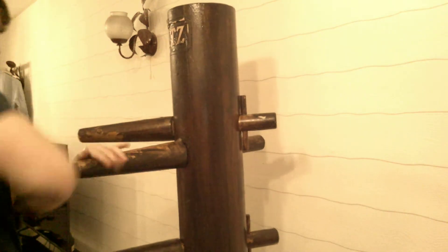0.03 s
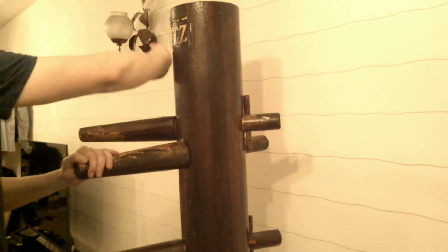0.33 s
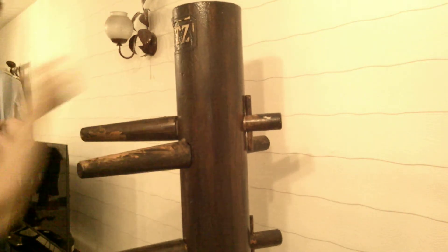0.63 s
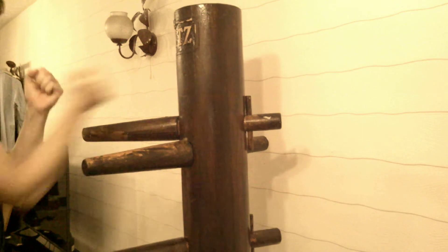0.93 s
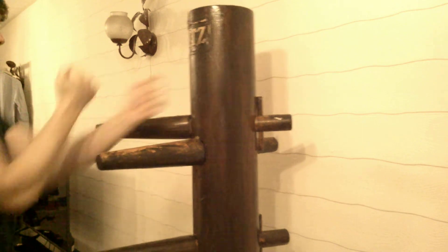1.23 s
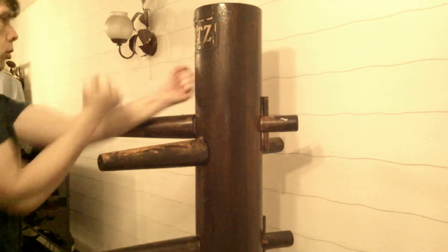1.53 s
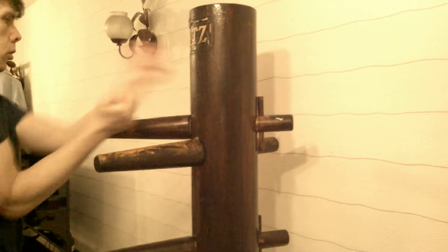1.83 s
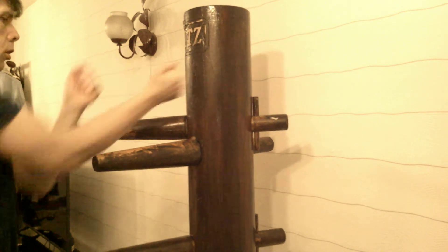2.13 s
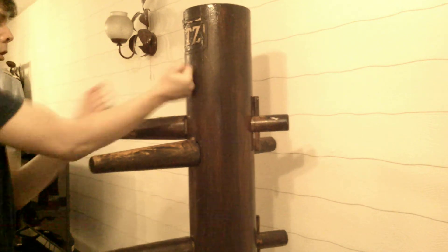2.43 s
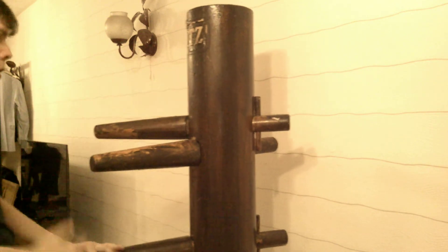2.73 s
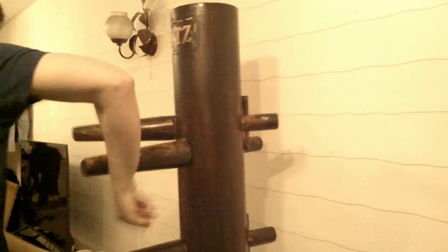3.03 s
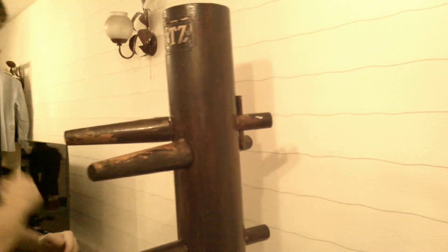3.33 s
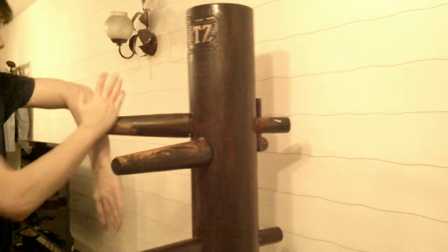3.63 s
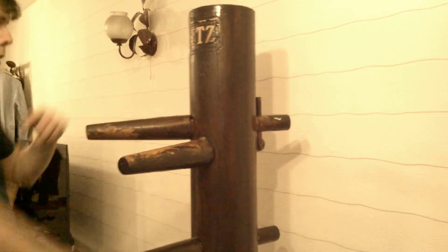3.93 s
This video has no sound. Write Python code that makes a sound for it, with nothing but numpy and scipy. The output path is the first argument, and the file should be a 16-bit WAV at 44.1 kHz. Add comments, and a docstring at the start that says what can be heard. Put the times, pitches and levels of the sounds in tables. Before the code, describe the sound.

A wooden practice dummy takes a run of dull blows and skin slaps, with low booms and faint sleeve rustles between them. Two much louder, hollow wooden knocks follow, rattling and slightly overloading the microphone in a small room.

```python
"""Practice on a wooden training dummy

In a small, quiet room, hands and forearms slap each other and thud on the dummy's trunk.
After each blow the heavy trunk sways with a low boom; sleeves rustle between moves.
Twice a loose wooden arm is whacked hard against its socket: it knocks, clatters and rings,
overloading the microphone."""
import sys
import numpy as np
from scipy import signal
from scipy.io import wavfile

SR = 44100
rng = np.random.default_rng(int(sys.argv[2]) if len(sys.argv) > 2 else 0)


def generate_wav(signal):
    """Clip the signal to [-1, 1] and save it as 16-bit WAV at the path in sys.argv[1]."""
    frames = np.transpose(np.atleast_2d(signal))
    scaled = np.clip(frames, -1, 1) * 32767
    pcm = np.round(scaled).astype(np.int16)
    wavfile.write(sys.argv[1], SR, pcm)


N = 176400
T = np.arange(N) / SR

# Blows of hands and forearms. Each row: start in seconds, thud level in dB, thud pitch in Hz,
# smack level in dB, skin brush level in dB, boom level in dB.
HAND_BLOWS = [(0.01, -32, 158.5, -56, -81, -45), (0.22, -31, 241, -55.5, -76, -25.5),
              (0.618, -38, 212, -74, -99, -64), (0.65, -39.5, 141, -74, -97, -42),
              (0.975, -42.5, 334, -50.5, -98, -31.5), (1.04, -51.5, 250, -56, -96, -62),
              (1.102, -34.5, 164, -39, -68, -23.5), (1.144, -38.5, 119, -54, -88, -53),
              (1.33, -45, 430, -64.5, -96, -40), (1.492, -41.5, 176, -41, -67, -30),
              (1.518, -43.5, 109, -49, -68, -41), (1.591, -53, 560, -69, -90, -36),
              (1.66, -25, 230.4, -42, -76, -25), (1.715, -30.5, 380, -44, -64, -46),
              (1.829, -50.5, 250, -51, -77, -27.5), (1.851, -28, 230, -41.5, -67, -41),
              (2.037, -29.5, 120, -43.5, -68, -23), (2.227, -41, 515, -51, -77, -30),
              (2.31, -40, 526, -71, -99, -56), (2.3795, -31.5, 210, -35.5, -85, -24.5),
              (2.597, -43, 304, -68, -95, -28.5), (2.987, -29, 382, -35, -64.5, -25.5),
              (3.14, -56, 300, -56.5, -77, -51.5), (3.376, -59, 560, -59.5, -87, -50),
              (3.448, -36, 123, -66, -90, -51), (3.551, -24, 193, -29.5, -58, -25.5),
              (3.709, -34.5, 295, -51.5, -91, -52)]

# Noise is shaped in bands a third of an octave wide; edges and centres are in Hz.
EDGES = 8200 * 2 ** (np.arange(-26, 4) / 3)
CENTRES = np.sqrt(EDGES[1:] * EDGES[:-1])
BAND_FILTERS = [signal.butter(3, band, "band", fs=SR, output="sos") for band in zip(EDGES, EDGES[1:])]


def from_db(db):
    """Turns decibels into a gain; square it to get power."""
    return 10 ** (np.asarray(db) / 20)


def at_bands(points):
    """Reads a table of frequencies and values at the centre of each band."""
    hz, value = np.transpose(points)
    return np.interp(np.log(CENTRES), np.log(hz), value)


def shares(db_per_hz):
    """The share of the total power that falls in each band."""
    power = from_db(db_per_hz) ** 2 * np.diff(EDGES)
    return power / power.sum()


def add(out, start, sound):
    """Mixes a sound in at a start time in seconds."""
    i = max(int(start * SR), 0)
    out[i:i + len(sound)] += sound[:N - i]


def swell(rise_s):
    """Rises smoothly to 1 at rise_s, then dies away."""
    progress = T[:SR] / rise_s
    return (progress * np.exp(1 - progress)) ** 2


def damped_tone(hz, rise_s):
    """A short tone that swells and dies."""
    return swell(rise_s) * np.sin(2 * np.pi * hz * T[:SR])


def ring(modes):
    """A struck thing rings with its own tones (modes), each fading by 60 dB in fade_s seconds."""
    t = T[:SR]
    return sum((-1) ** k * from_db(db - 60 * t / fade_s) * np.sin(2 * np.pi * hz * t)
               for k, (hz, fade_s, db) in enumerate(modes))


def banded_noise(powers):
    """Noise in which each band follows its own power over time."""
    white, out = rng.standard_normal((2, N)), 0
    for k, power in enumerate(powers):
        gain = np.sqrt((power + 1e-18) * SR / 2 / (EDGES[k + 1] - EDGES[k]))
        out = out + signal.sosfilt(BAND_FILTERS[k], white[k % 2] * gain)
    return out


def in_room(blows, powers, rise_s, direct_db, echo_scale):
    """Each blow is a short burst of noise, direct_db above a room echo whose low notes last longest."""
    # Each row: frequency in Hz, seconds for the echo to fade by 60 dB before echo_scale shortens it.
    echo_times = [(60, 0.92), (150, 0.41), (400, 0.41), (800, 0.33), (2000, 0.36), (4000, 0.25),
                  (8000, 0.22)]
    t, burst_fade_s = T[:SR], 0.066
    direct = from_db(direct_db - 60 * t / burst_fade_s) ** 2
    onset = (1 - np.exp(-t / rise_s)) ** 2
    bands = []
    for fade_s, strengths in zip(at_bands(echo_times) * echo_scale, np.transpose(powers)):
        echo = from_db(-60 * t / fade_s) ** 2
        decay = onset * (direct + echo)
        power = np.zeros(N)
        for (start, *_), strength in zip(blows, strengths):
            add(power, start, strength * decay)
        bands.append(power)
    return banded_noise(bands)


def background():
    """The room rumbles and hisses softly, and sleeves swish between the blows."""
    # Tone colours of the room and the cloth. Each row: frequency in Hz, relative level in dB per Hz.
    room_colour = [(15, 22), (26, 8), (45, -5.5), (80, -6), (130, -12.5), (180, -28), (280, -20.5),
                   (400, -33.5), (650, -20), (900, -36.5), (1200, -40.5), (2000, -47.5), (2900, -55),
                   (4200, -75.5), (7400, -64), (10000, -85.5), (16000, -85)]
    sleeve_colour = [(120, 0.5), (300, 15), (700, 9.5), (1100, -2.5), (2000, -14), (3000, -21), (4500, -50),
                     (7400, -43), (10000, -64)]
    # Sleeve movements. Each row: start in seconds, level in dB, length in seconds.
    swishes = [(0.76, -53, 0.32), (1.23, -50, 0.12), (1.438, -47, 0.062), (1.56, -62, .1),
               (1.713, -42.5, 0.1), (2.263, -53, 0.19), (2.714, -45.5, 0.29), (3.348, -53, .16)]
    motion = np.zeros(N)
    for start, db, length in swishes:
        arch = np.sin(np.pi * np.clip(T[:SR] / length, 0, 1))
        add(motion, start, (from_db(db) * arch) ** 2)
    room = from_db(-39) ** 2 * shares(at_bands(room_colour))
    sleeves = shares(at_bands(sleeve_colour))
    return banded_noise([steady + cloth * motion for steady, cloth in zip(room, sleeves)])


def brushes():
    """Skin slides on skin for a moment after contact, giving a faint high hiss."""
    # Tone colour of the hiss. Each row: frequency in Hz, relative level in dB per Hz.
    brush_colour = [(2500, -14.5), (4000, 12), (5200, -17), (6400, 8.5), (7400, 2.5), (9000, -33),
                    (11000, -56)]
    hiss = shares(at_bands(brush_colour))
    powers = [from_db(brush_db) ** 2 * hiss for *_, brush_db, _ in HAND_BLOWS]
    return in_room(HAND_BLOWS, powers, rise_s=0.009, direct_db=10.5, echo_scale=0.97)


def booms():
    """The heavy trunk sways on its frame after a blow, making a very low boom."""
    out = np.zeros(N)
    for start, *_, boom_db in HAND_BLOWS:
        add(out, start, from_db(boom_db) * damped_tone(hz=28.25, rise_s=0.05))
    return out


def slaps():
    """Flesh gives a dull thud with a pitch; skin gives a snap and a noisy smack."""
    # Tones of the snap. Each row: pitch in Hz, seconds to fade by 60 dB, dB relative to the smack.
    snap_modes = [(560, .03, 2), (883, 0.15, 1.5), (1527, 0.037, 2.5), (2125, 0.099, -6.5),
                  (2796, 0.14, -9)]
    # Tone colour of the smack. Each row: frequency in Hz, relative level in dB per Hz.
    smack_colour = [(150, -1), (400, 8), (700, 7), (900, 1.5), (1150, -1.5), (1600, 3.5), (2200, -1.5),
                    (2850, -7), (3600, -22.5), (4500, -41), (9000, -66.5), (11000, -73)]
    rise_s = 0.0006
    tone_db, noise_db = 4, -1.5  # the thud's two parts, relative to its level
    cycles_to_peak, width_octaves = 1.4, 0.81
    snap = ring(snap_modes) * (1 - np.exp(-T[:SR] / rise_s))
    smack = shares(at_bands(smack_colour))
    tones, powers = np.zeros(N), []
    for start, thud_db, hz, smack_db, *_ in HAND_BLOWS:
        thud_tone = from_db(thud_db + tone_db) * damped_tone(hz, cycles_to_peak / hz)
        add(tones, start, thud_tone + from_db(smack_db) * snap)
        # The thud's noise is 9 dB weaker one width above its pitch, 1.5 dB weaker one width below.
        widths = np.log2(CENTRES / hz) / width_octaves
        thud = shares(np.where(widths > 0, -9 * widths ** 2, 1.5 * widths))
        powers.append(from_db(thud_db + noise_db) ** 2 * thud + from_db(smack_db) ** 2 * smack)
    return tones + in_room(HAND_BLOWS, powers, rise_s, direct_db=4.5, echo_scale=0.92)


def wooden_arms():
    """A struck arm scrapes, then rings, clatters in its socket and sets the trunk humming."""
    # Blows on the arms. Each row: start in seconds, ring level in dB, clatter level in dB,
    # trunk hum level in dB, place from 0 (lower arm) to 1 (upper arm).
    arm_blows = [(.001, -33, -28, -38, 0.93), (0.229, -38, -41.5, -38, 0.22),
                 (2.042, -39, -42.5, -41.5, 0.68), (2.708, -31.5, -37, -29.5, 0.44),
                 (2.981, -9.5, -15, -27, 0.18), (3.549, -11, -9, -18.5, 1.0),
                 (3.631, -26.5, -23.5, -22, 0.5), (3.708, -46, -28, -35.5, 0.13)]
    # Tones of the arms. Each row: pitch in Hz, seconds to fade by 60 dB,
    # relative level in dB when the lower arm is struck, the same for the upper arm.
    arm_modes = [(182, .5, -24, -14), (238, .4, -16, -11), (253, .3, -10, -18), (296, .4, -12, -16),
                 (341, .45, -10, -9), (420, .35, -12, -14), (446, .4, -16, -9), (493, .3, -8, -19),
                 (534, .34, -14, 0), (589, .42, -13, -4), (608, .38, 1, -15), (657, .45, -13, -14),
                 (731, .33, -6, -13), (922, .38, -26, -8)]
    # Tones of the trunk. Each row: pitch in Hz, seconds to fade by 60 dB, relative level in dB.
    trunk_modes = [(132, 1.2, -17), (268, .55, 0)]
    # Tone colour of clatter and scrape. Each row: frequency in Hz, relative level in dB per Hz.
    clatter_colour = [(100, -23.5), (250, 0), (400, -6), (560, 2), (720, -3), (900, -12), (1080, -15.5),
                      (1600, -24.5), (2500, -37), (4000, -54), (8000, -61), (11000, -95.5)]
    ring_rise_s, scrape_rise_s = 0.008, 0.0059
    onset = 1 - np.exp(-T[:SR] / ring_rise_s)
    colour = shares(at_bands(clatter_colour))
    ringing, scrape, powers = np.zeros(N), np.zeros(N), []
    for start, ring_db, clatter_db, hum_db, place in arm_blows:
        arm = [(hz, fade_s, ring_db + lower + place * (upper - lower))
               for hz, fade_s, lower, upper in arm_modes]
        trunk = [(hz, fade_s, hum_db + db) for hz, fade_s, db in trunk_modes]
        add(ringing, start, onset * ring(arm + trunk))
        # The loose arm scrapes across the gap in its socket just before it lands.
        add(scrape, start - 2 * scrape_rise_s, (from_db(clatter_db - 9) * swell(scrape_rise_s)) ** 2)
        powers.append(from_db(clatter_db) ** 2 * colour)
    clatter = in_room(arm_blows, powers, rise_s=0.0018, direct_db=0.5, echo_scale=0.87)
    return ringing + clatter + banded_noise([share * scrape for share in colour])


def knocks():
    """An arm hits the wall of its socket: wood on wood gives a hollow tone that dies quickly."""
    # Each row: start in seconds, peak level in dB, pitch in Hz, seconds to reach the peak.
    socket_hits = [(.001, -17, 592, 0.003), (1.331, -39, 760, 0.0025), (2.381, -33, 900, 0.013),
                   (2.707, -22, 618, 0.0028), (2.9761, 0, 581.3, 0.009), (3.027, -11, 567, 0.0045),
                   (3.546, -5.5, 900.6, 0.0052), (3.548, -5.5, 524.4, 0.0039), (3.559, -7, 705, 0.0052),
                   (3.572, -7, 650, 0.00075), (3.589, -14.5, 510, 0.011), (3.708, -19.5, 706, 0.0022)]
    out = np.zeros(N)
    for start, db, hz, rise_s in socket_hits:
        add(out, start, from_db(db) * damped_tone(hz, rise_s))
    return out


def scene():
    """All the sounds meet at one microphone."""
    return (slaps() + brushes() + booms() + wooden_arms() + knocks() + background())[None]


def record(dry):
    """The overloaded microphone flattens the loudest peaks, and the highest treble is cut."""
    ceiling, hardness, cutoff_hz = 0.705, 30, 16000
    flattened = dry / (1 + (np.abs(dry) / ceiling) ** hardness) ** (1 / hardness)
    treble_cut = signal.cheby2(12, 70, cutoff_hz, fs=SR, output="sos")
    return signal.sosfilt(treble_cut, flattened)


dry = scene()
out = record(dry)
generate_wav(out)
```